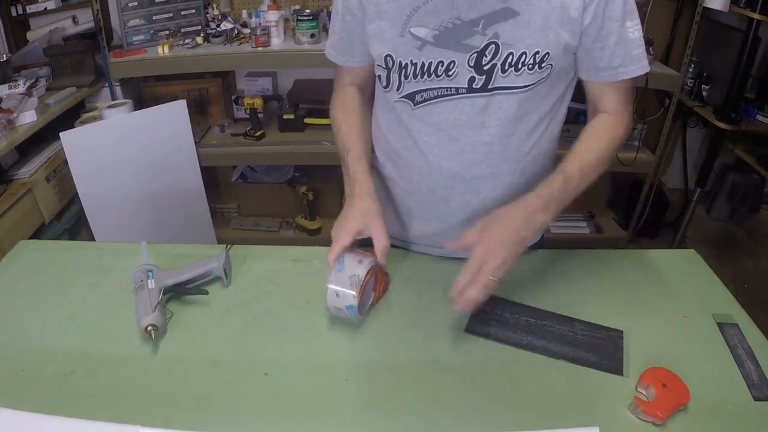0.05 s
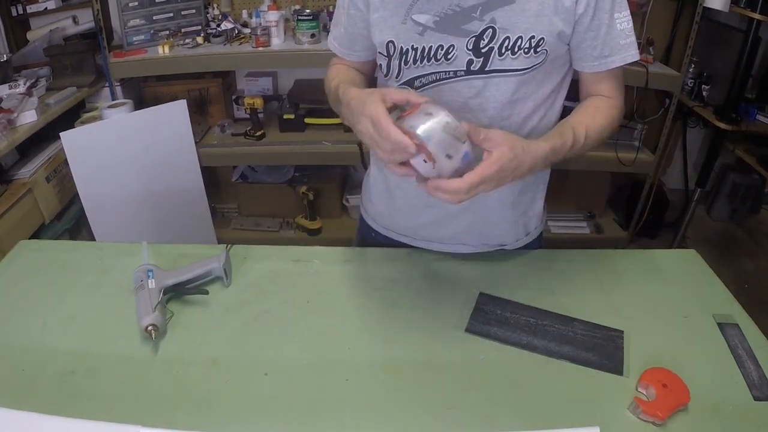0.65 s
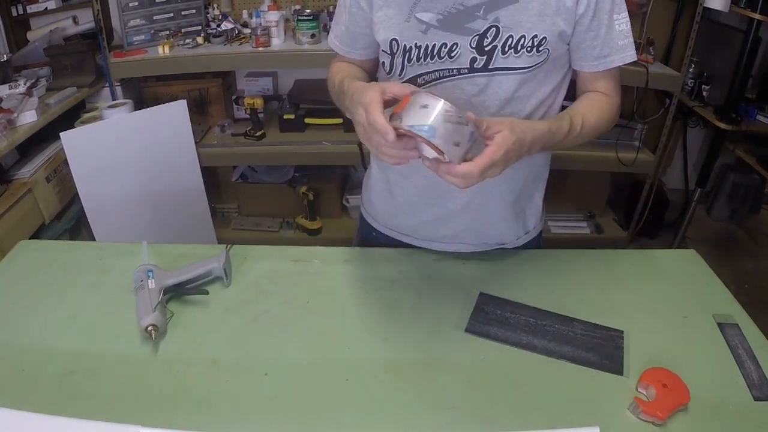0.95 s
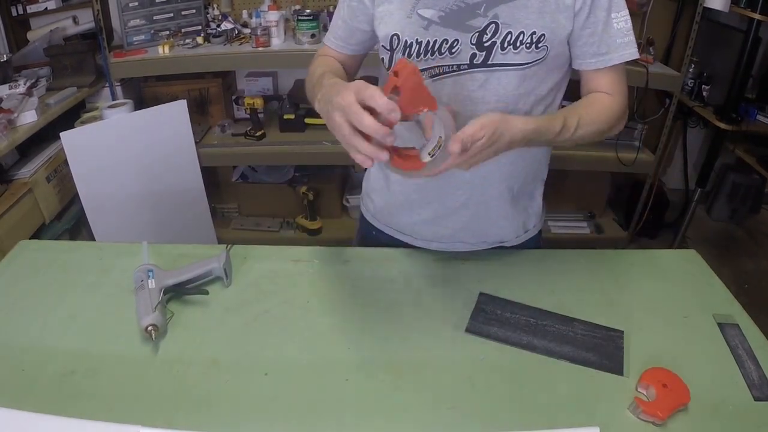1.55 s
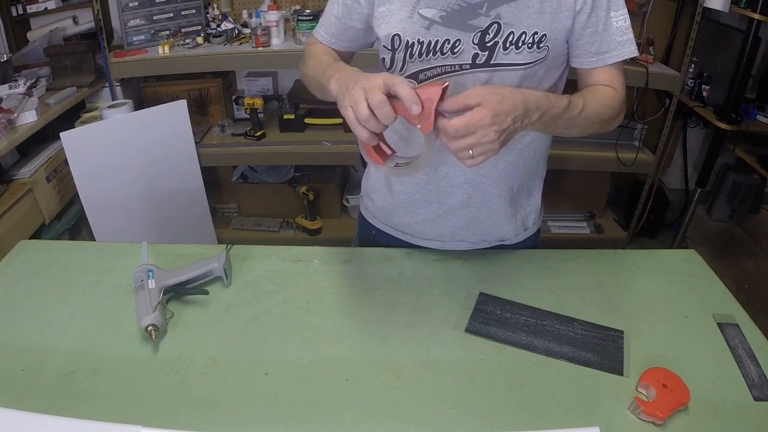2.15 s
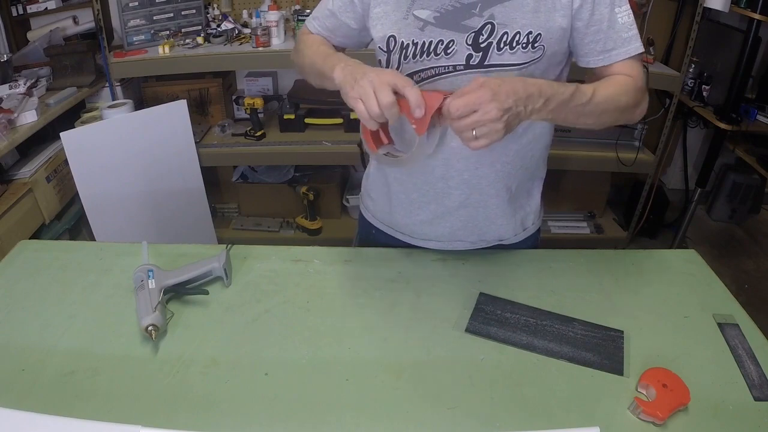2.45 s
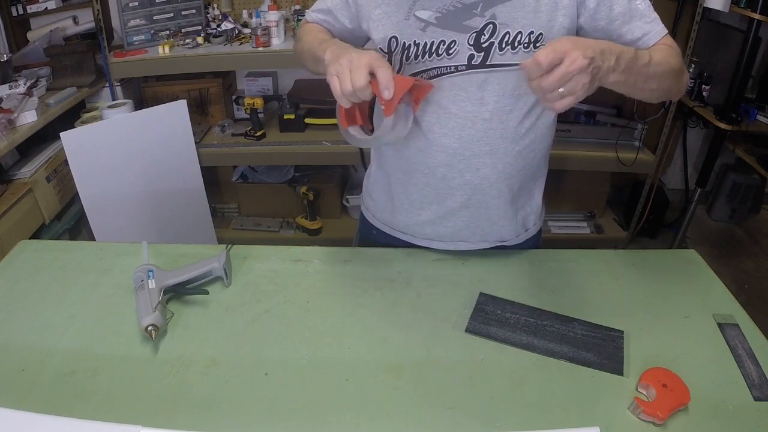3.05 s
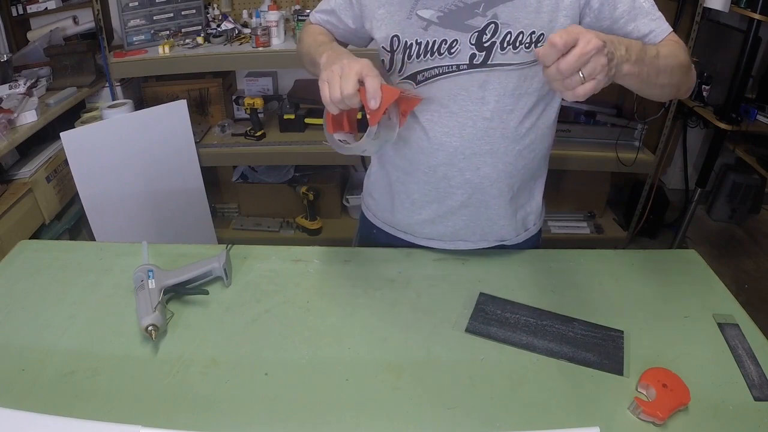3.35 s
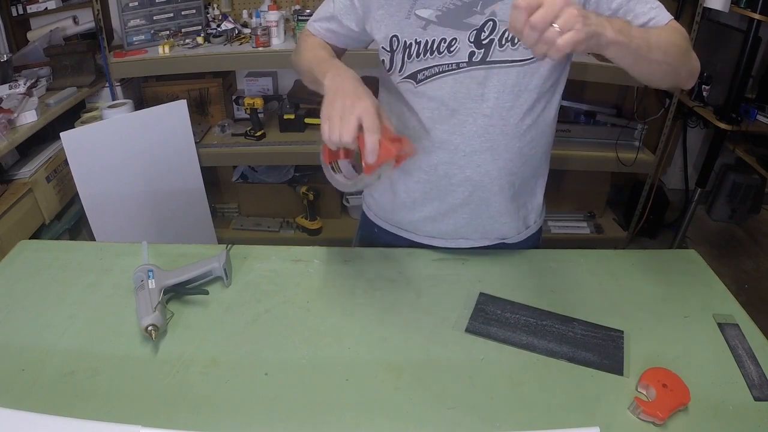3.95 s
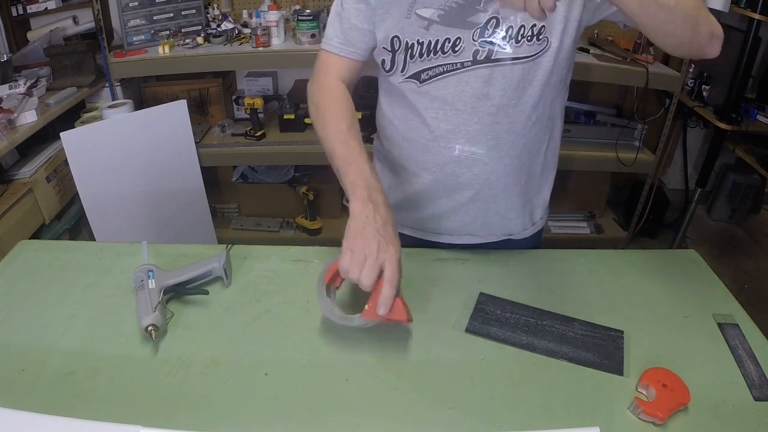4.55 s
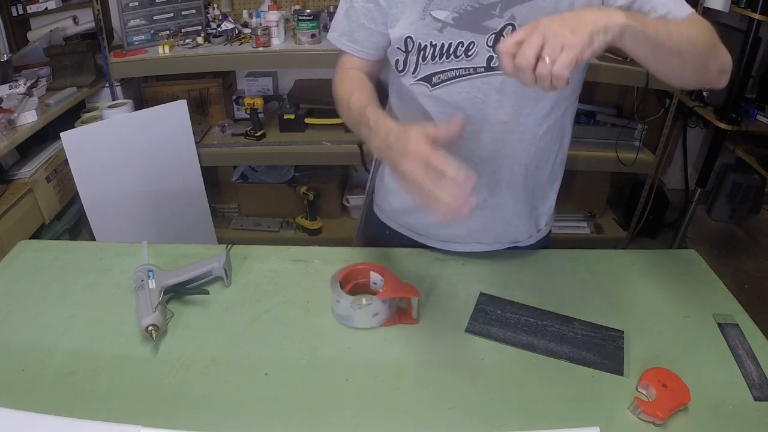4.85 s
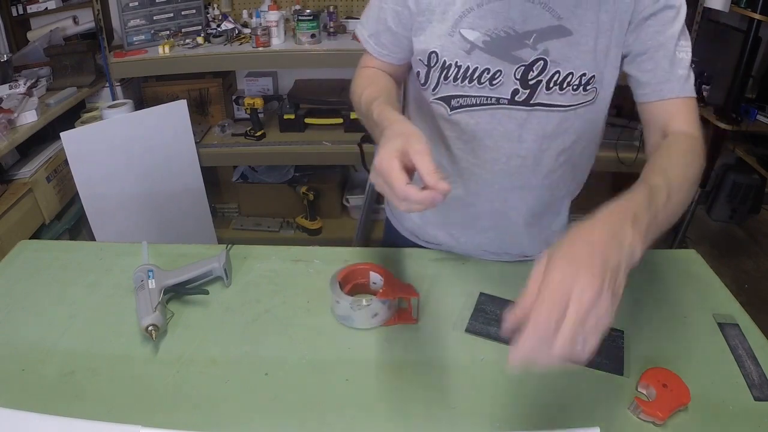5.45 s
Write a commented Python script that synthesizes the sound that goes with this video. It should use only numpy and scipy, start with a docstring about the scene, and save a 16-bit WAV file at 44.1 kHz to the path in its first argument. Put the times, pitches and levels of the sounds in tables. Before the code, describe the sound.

Light taps on a plastic tape dispenser, rasping pulls and sharp cracks of tape, then a double knock on a bench in a small room.

```python
"""In a small workshop, packing tape is drawn from a plastic hand dispenser over a workbench.
Fingers tap and rub the shell as they turn it. The tape unpeels by stick-slip friction, in rasping
pulls that excite the modes of shell and core, and snaps on the blade. The dispenser is set down
with two main knocks that ring the bench top, and the loose strip crinkles. Shelves return short
echoes; a faint rustle, room rumble and mains hum lie underneath."""
import sys
import numpy as np
from scipy import signal
from scipy.fft import rfft, irfft
from scipy.io import wavfile

SR = 44100
rng = np.random.default_rng(int(sys.argv[2]) if len(sys.argv) > 2 else 0)


def output_pcm(signal):
    """Save a mono or channel-first signal as 16-bit PCM at the path in sys.argv[1].

    Samples are clipped to [-1, 1] before scaling.
    """
    pcm = np.clip(np.atleast_2d(signal).T, -1, 1) * 32767
    wavfile.write(sys.argv[1], SR, np.round(pcm).astype(np.int16))


N = 246519
TIME = np.arange(N) / SR
SIZE = 16384  # samples in a resonator's impulse response
HZ = np.maximum(np.arange(SIZE // 2 + 1) * SR / SIZE, 1)

# Noise spectrum of the room. Each row: frequency in Hz, relative density in dB.
ROOM_SPECTRUM = [(12, -58.5), (20, -4.5), (91, -5), (123, -3), (150, -7.5), (241, -10.5), (1260, -22),
                 (1440, -20.5), (1810, -24.5), (2820, -28), (3840, -31), (11100, -70)]
# Finger taps. Each row: start in seconds, level in dB, hardness from 0 (fingertip) to 1 (nail).
FINGER_TAPS = [(.023, -16.5, .15), (.126, -17.5, 0.077), (.547, -24, 0.59), (.721, -17.5, 0.17),
               (.867, -27, .3), (1.254, -29.5, 0.88), (1.467, -31.5, 0.59), (1.613, -29, 0.62),
               (1.735, -34, .8), (2.023, -34, 1), (2.202, -30, 1), (2.266, -18.5, .45), (2.32, -23.5, 0.54),
               (3.485, -28, .1), (5.511, -37, 0.49)]
# Broad response of the roll in its plastic shell. Each row: frequency in Hz, relative gain in dB.
SHELL_SPECTRUM = [(30, -52), (100, -23.5), (200, -13.5), (600, -13.5), (1200, -19), (1500, -12),
                  (2050, -9.5), (2400, -5.5), (3050, -2.5), (4200, -15), (6400, -9), (9000, -21),
                  (10600, -14.5), (15000, -33)]
# Shell modes. Each row: frequency in Hz, level over the broad response in dB, T60 in seconds.
PLASTIC_MODES = [(1550, -2.5, 0.19), (1735, -2, 0.25), (2274, 2.5, 0.14), (2397, 3.5, 0.017),
                 (2550, 3, 0.13), (2530, -7.5, 0.059), (2868, 3, 0.16), (2972, 3, 0.097),
                 (3630, -14.5, .11)]
# Core modes. Each row: frequency in Hz, level over the broad response in dB, T60 in seconds.
CARDBOARD_MODES = [(370, -4.5, .12), (625, -12.5, 0.079), (666, -23.5, 0.18), (835, -18, 0.15),
                   (1082, -3, .09)]
# Crinkles and rubs. Each row: start and length in seconds, then level, hollow body and treble in dB.
FILM_SCRAPES = [(1.07, 0.075, -67, -14, 9), (4.287, 0.021, -25.5, -7.5, -3.5), (4.302, .025, -27, -7, 8),
                (4.502, 0.073, -64, -4, -1), (5.125, 0.057, -59, -2.5, -26), (5.284, 0.05, -61, -24, 1),
                (5.345, 0.028, -42, -4, 5.5), (5.394, 0.049, -56, 15, 16)]
# Sharp cracks of tape. Each row: start in seconds, then level, hollow body and treble in dB.
TAPE_CRACKS = [(2.365, -14.5, 2, -5), (2.4, 1, -2, 10.5), (2.4134, -4, -1.5, 9), (3.53, -17, 1, -4),
               (3.543, -6, -12, 3.5), (3.555, 6.5, -1, 0.5), (4.1333, 5, -6, 1.5), (4.222, -5.5, -14, -8),
               (4.249, -15.5, -5, 8)]
# Pulls of tape. Each row: start and length in seconds, level and final slackening in dB, slips per
# second, the strip's lowest and highest frequency in Hz, strip level and treble in dB.
TAPE_PULLS = [(2.5332, 0.11, -16, 5, 590, 328, 1020, 3, 4),
              (2.7806, 0.018, -18, 2.5, 510, 160, 1250, -8, -0.5),
              (2.828, .2, -18, 10.5, 660, 165, 1210, -9.5, -2.5),
              (3.0934, 0.11, -18.5, 0.1, 540, 326, 1096, -3.5, -3),
              (3.5096, 0.088, -21.5, 10, 330, 341.4, 1170, -5.5, -1.5)]
# Blows on the bench. Each row: start in seconds, level in dB, contact cut-off in Hz,
# rattle length in seconds, rattle level and rattle treble in dB.
BENCH_KNOCKS = [(4.6835, 16, 420, .027, -4.5, -10.5), (4.758, 2, 380, .036, -0.5, 1),
                (4.8301, 17.5, 1360, .006, 5, 4), (5.392, -17, 420, .02, -39, -2)]
# Dull thud of the bench top. Each row: frequency in Hz, relative gain in dB.
THUD_SPECTRUM = [(25, -9), (60, -9.5), (150, 1), (260, -6), (480, -2.5), (700, -1.5), (1100, -2),
                 (1450, -7), (2600, -3.5), (5000, -29.5), (12000, -32)]
# Bench top modes. Each row: frequency in Hz, level over the thud in dB, T60 in seconds.
BENCH_TOP_MODES = [(38, 12, 1.2), (150, -7.5, 0.35), (221, 9.5, 1.4), (265, 8.5, 0.062), (357, 7.5, 0.28),
                   (423, 8.5, 0.21), (466, 1.5, 0.35), (617.6, 6, 0.081), (680, 3, 0.057), (790, -6, 0.16),
                   (910, -23, 0.31), (1090, 4.5, 0.091), (1740, -6, 0.14)]


def amp(db):
    """Amplitude grows tenfold for every 20 dB."""
    return 10 ** (np.asarray(db) / 20)


def unit(response):
    """Normalisation: the energy, or sum of squares, becomes one."""
    return response / np.sqrt(np.sum(response ** 2))


def through(x, response):
    """Convolution passes a signal through a linear system."""
    return signal.fftconvolve(x, response)[:len(x)]


def butter(x, hz, kind, order=2):
    """A Butterworth filter has a maximally flat passband."""
    return signal.sosfilt(signal.butter(order, hz, kind, fs=SR, output="sos"), x)


def add(track, start_s, sound):
    """Superposition: a sound adds linearly to the track."""
    i = max(int(start_s * SR), 0)
    track[i:i + len(sound)] += sound[:max(len(track) - i, 0)]


def outline(points):
    """A spectral envelope joins (Hz, dB) points along a logarithmic frequency axis."""
    hz, db = np.transpose(points)
    return amp(np.interp(np.log(HZ), np.log(hz), db))


def band(low_hz, high_hz, order=6):
    """Modal overlap: crowded, well damped modes merge into one band of gain."""
    return ((1 + (low_hz / HZ) ** (2 * order)) * (1 + (HZ / high_hz) ** (2 * order))) ** -.5


def ring(modes):
    """Resonance: each damped mode adds a narrow peak to a flat gain."""
    peaks = sum(amp(db) / (1 + 2j * np.pi * (HZ - hz) * t60 / np.log(1000)) for hz, db, t60 in modes)
    return np.abs(1 + peaks)


def colour(gain):
    """Minimum phase: folding the cepstrum turns a gain curve into a causal impulse response."""
    cepstrum = irfft(np.log(gain))
    cepstrum[1:SIZE // 2] *= 2
    cepstrum[SIZE // 2 + 1:] = 0
    return unit(irfft(np.exp(rfft(cepstrum))))


def smear(decay_s, size=1024):
    """Diffusion: waves criss-cross a part before they leave it, making a brief colourless burst."""
    burst, fade = rng.standard_normal(size), np.exp(-TIME[:size] / decay_s)
    for _ in range(10):
        phase = np.angle(rfft(burst * fade))
        burst = irfft(np.exp(1j * phase))  # flatten the spectrum
    return unit(burst * fade)


def slips(length_s, rate, jitter, scatter_db):
    """Stick-slip friction gives uneven impulses of mean power 1; silence follows to ring into."""
    chance = rng.standard_normal((SIZE // 16, 2))
    gaps = np.exp(jitter * chance[:, 0]) / rate
    when = np.cumsum(gaps) - gaps[0]
    live = when < length_s
    strengths = amp(scatter_db * np.clip(chance[live, 1], -2, 2))
    train = np.zeros(int(length_s * SR) + SIZE)
    np.add.at(train, (when[live] * SR).astype(int), strengths)
    return unit(train) * np.sqrt(length_s * SR)


def grains(length_s, rate):
    """Rough contact gives a run of tiny catches that push either way, with unit energy."""
    run = slips(length_s, rate, jitter=.7, scatter_db=4)
    return unit(run * rng.choice([-1, 1], len(run)))


def background(air_db=-55, hum_db=-58, hum_hz=119.5):
    """Stationary noise gives the room's rumble and hiss; the mains hum is a pure tone."""
    air = through(rng.standard_normal(N), colour(outline(ROOM_SPECTRUM)))
    return amp(air_db) * air + amp(hum_db) * np.sin(2 * np.pi * hum_hz * TIME)


def rustle(level_db=-72, band_hz=(900, 5000)):
    """Friction of sleeves and fingers gives a faint, steady band of noise."""
    hiss = butter(rng.standard_normal(N), band_hz, "band", order=1)
    return hiss / hiss.std() * amp(level_db)


def hollow(db, low_hz=340, high_hz=1300):
    """Cavity resonance: the hollow inside of the roll lifts a band of middle frequencies."""
    return amp(db) * band(low_hz, high_hz, order=4)


def dispenser(body_gain, ping_db, treble_db, contact_hz=17000, shelf_hz=4000):
    """Impulse response: shell, thin lip and body add in power, and the contact shapes the treble."""
    lip = amp(ping_db) * band(low_hz=2950, high_hz=3500, order=14)
    broad = np.sqrt(outline(SHELL_SPECTRUM) ** 2 + lip ** 2 + body_gain ** 2)
    treble_shelf = amp(treble_db * HZ ** 4 / (HZ ** 4 + shelf_hz ** 4))
    contact = treble_shelf * band(1, contact_hz, order=4)
    response = colour(broad * contact * ring(PLASTIC_MODES + CARDBOARD_MODES))
    return unit(through(response, smear(decay_s=.0022)))


def tapping(lead_s=.0069, skid_db=-3.5):
    """Contact hardness sets the spectrum: a fingertip rings the shell's lip, a nail ticks brightly."""
    out = np.zeros(N)
    for start, db, hardness in FINGER_TAPS:
        force = amp(skid_db) * grains(length_s=.026, rate=650)
        add(force, lead_s, np.ones(1))  # the finger lands during a brief skid
        ping_db = np.interp(hardness, [0, 1], [3.5, -5])
        treble_db = np.interp(hardness, [0, 1], [-8, 3.5])
        contact_hz = np.interp(hardness, [0, 1], [7800, 14000])
        shell = dispenser(hollow(db=-7), ping_db, treble_db, contact_hz)
        add(out, start - lead_s, amp(db) * through(force, shell))
    return out


def scraping(swell_db=3, ping_db=-6):
    """Crinkling film and rubbing fingers drive the shell with impulse trains that swell, then stop."""
    out = np.zeros(N)
    for start, length, db, body_db, treble_db in FILM_SCRAPES:
        run = grains(length, rate=1300)
        progress = np.minimum(TIME[:len(run)] / length, 1)
        force = unit(run * amp(swell_db * progress)) * np.sqrt(length * SR)
        shell = dispenser(hollow(body_db), ping_db, treble_db)
        add(out, start, amp(db) * through(force, shell))
    return out


def cracking(crackle_db=-3.5, ping_db=-6):
    """Sudden release of tension: tape jumps free or parts on the blade with a snap and brief crackle."""
    out = np.zeros(N)
    for start, db, body_db, treble_db in TAPE_CRACKS:
        force = amp(crackle_db) * grains(length_s=.0019, rate=1800)
        force[0] = 1  # the snap
        shell = dispenser(hollow(body_db), ping_db, treble_db, contact_hz=16500)
        add(out, start, amp(db) * through(unit(force), shell))
    return out


def unpeeling(fizz_db=-5, fizz_hz=500, surge_db=.65, surge_hz=70, break_db=2.5, break_s=.012):
    """Stick-slip: glue lets go in jerks, its threads fizz, and the taut strip radiates as a membrane."""
    grip_db = surge_db * np.interp(TIME * surge_hz, np.arange(N), rng.standard_normal(N))
    out = np.zeros(N)
    for start, length, db, slack_db, rate, low_hz, high_hz, strip_db, treble_db in TAPE_PULLS:
        jerks = slips(length, rate, jitter=.55, scatter_db=2)
        t = TIME[:len(jerks)]
        fizz_envelope = butter(jerks, fizz_hz, "low", order=1)
        fizz = unit(fizz_envelope * rng.standard_normal(len(t))) * np.sqrt(length * SR)
        onset_db = break_db * np.exp(-t / break_s)  # the glue first breaks free
        fade_db = slack_db * np.minimum(t / length, 1) ** 3.2  # holds, then gives way ever faster
        strength = amp(db + onset_db - fade_db + grip_db[int(start * SR):][:len(t)])
        force = (jerks + amp(fizz_db) * fizz) * strength
        strip = amp(strip_db) * band(low_hz, high_hz)
        add(out, start, through(force, dispenser(strip, ping_db=-12, treble_db=treble_db)))
    return out


def knocking(bounce_s=.0115, bounce_loss_db=17):
    """Impact: the dispenser lands on an edge and tips flat; harder contact excites higher bench modes."""
    out = np.zeros(N)
    bench_top = colour(outline(THUD_SPECTRUM) * ring(BENCH_TOP_MODES))
    for start, db, contact_hz, *_ in BENCH_KNOCKS:
        blow = unit(butter(bench_top, contact_hz, "low"))
        for bounce in range(4):
            add(out, start + bounce * bounce_s, amp(db - bounce * bounce_loss_db) * blow)
    return butter(out, 30, "high")


def rattling(lag_s=.001406, ping_db=-4):
    """Secondary impacts: each blow on the bench rattles the roll in its shell."""
    out = np.zeros(N)
    for start, _, _, length, db, treble_db in BENCH_KNOCKS:
        shell = dispenser(hollow(db=-8), ping_db, treble_db, contact_hz=7400)
        add(out, start + lag_s, amp(db) * through(grains(length, rate=1000), shell))
    return out


def echoes(t60_low_s=.26, t60_mid_s=.21, t60_high_s=.15, gap_s=.00029, build_s=.0014):
    """Scattering from cluttered shelves quickly builds a dense tail whose treble dies first."""
    t = TIME[:SR // 2]
    noise = rng.standard_normal(len(t))
    low, high = butter(noise, 460, "low", order=1), butter(noise, 6800, "high", order=1)
    bands = [(low, t60_low_s), (noise - low - high, t60_mid_s), (high, t60_high_s)]
    tail = sum(part * np.exp(-np.log(1000) * t / t60) for part, t60 in bands)
    return unit(tail * np.clip((t - gap_s) / build_s, 0, 1))


def workshop(direct, drift_hz=4):
    """Time-varying reverberation: as the hands move, one pattern of echoes gives way to another."""
    turn = 2 * np.pi * drift_hz * TIME
    return direct + through(direct * np.cos(turn), echoes()) + through(direct * np.sin(turn), echoes())


def scene():
    """Superposition: the sounds at the bench, their echoes and the background sum in one channel."""
    sources = unpeeling() + tapping() + cracking() + scraping() + knocking() + rattling() + rustle()
    return (workshop(sources) + background())[None]


def record(dry, ceiling=1.15, top_hz=15500):
    """Soft saturation rounds the tallest peaks, and a steep low-pass limits the bandwidth."""
    rounded = ceiling * np.tanh(dry / ceiling)
    return signal.sosfilt(signal.ellip(8, .2, 70, top_hz, fs=SR, output="sos"), rounded)


dry = scene()
out = record(dry)
output_pcm(out)
```